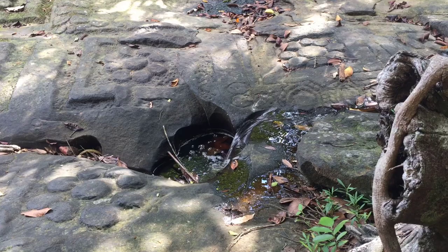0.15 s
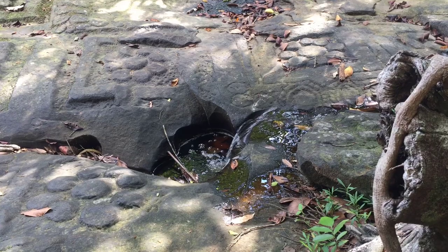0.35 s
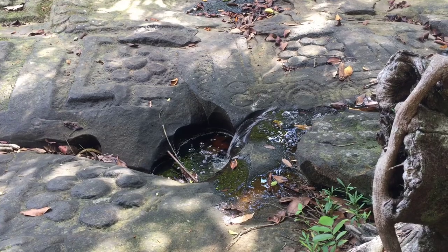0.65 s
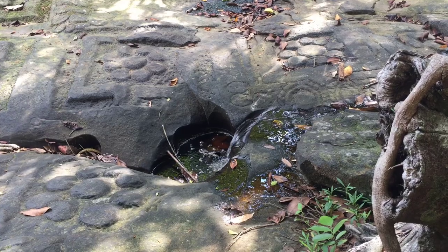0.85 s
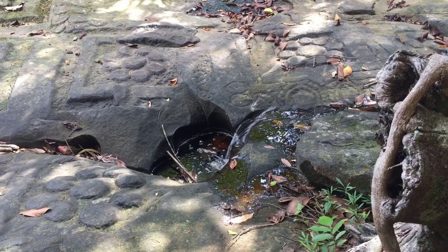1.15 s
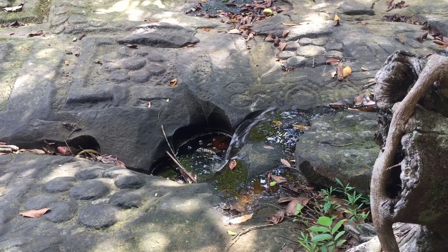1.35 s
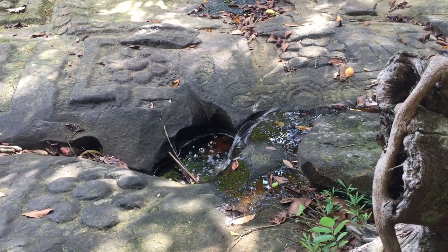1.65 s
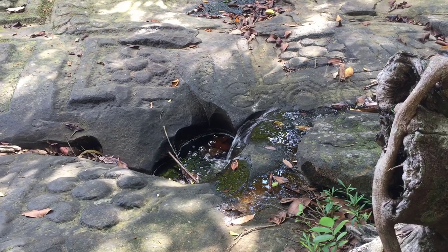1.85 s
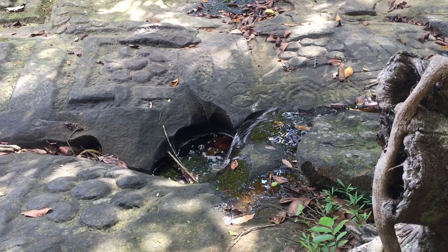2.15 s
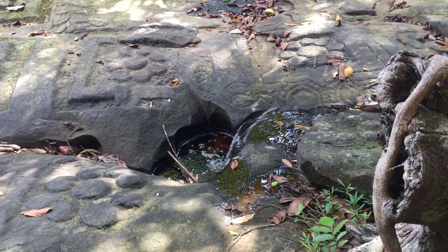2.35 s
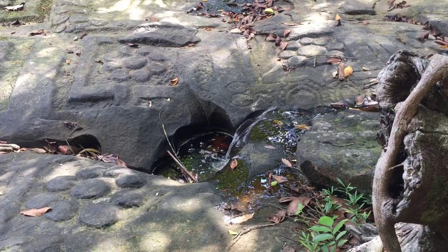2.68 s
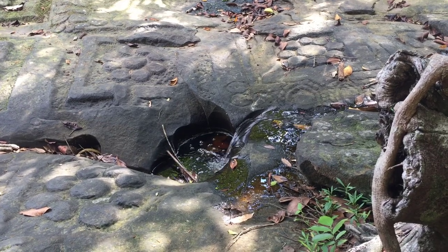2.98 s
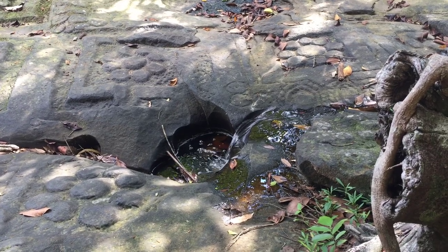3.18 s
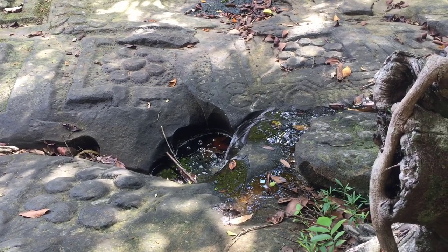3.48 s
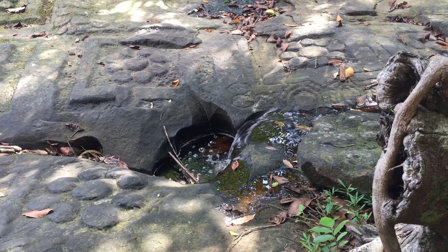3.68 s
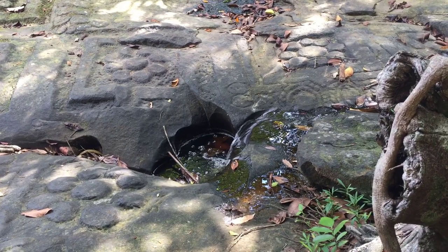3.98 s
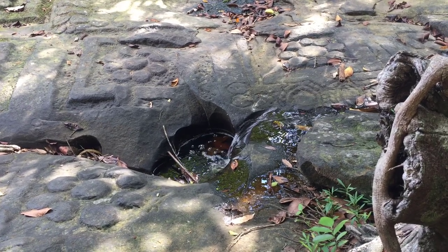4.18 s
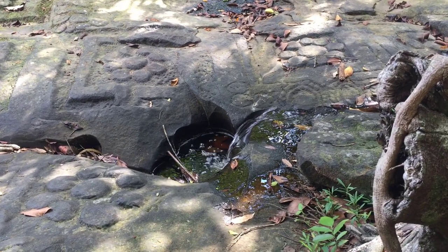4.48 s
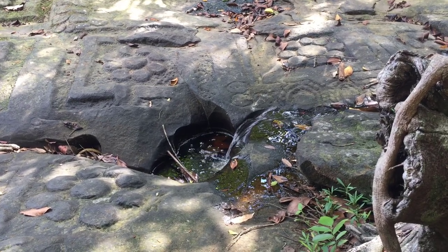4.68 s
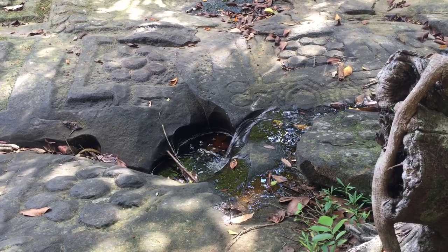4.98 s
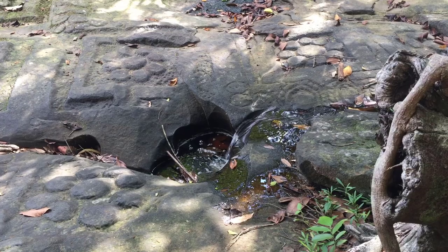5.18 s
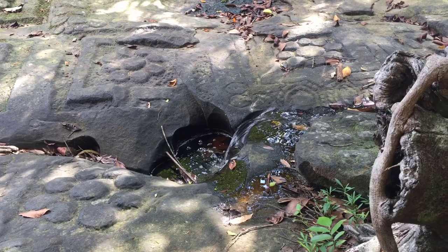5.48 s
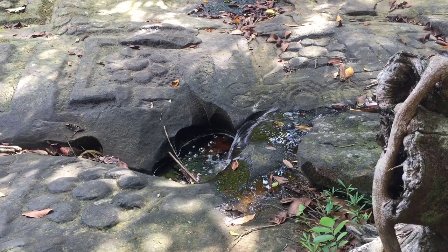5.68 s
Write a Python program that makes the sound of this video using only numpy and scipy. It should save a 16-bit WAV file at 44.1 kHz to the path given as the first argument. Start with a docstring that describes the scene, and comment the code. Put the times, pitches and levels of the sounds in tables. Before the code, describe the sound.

A thin stream of water trickles and plinks into a small rock pool, with gurgling bubbles and a faint high insect hiss behind.

```python
"""A thin stream slides over stone and falls into a small rock pool: bubbles plink as damped rising tones,
drops splash as bursts of tiny bubbles, and countless smaller ones gurgle and fizz with the flow.
Decaying low tones are soft gulps of air; resonances and a short echo are the hollow and its stone.
Behind lie a steady high hiss, likely forest insects, and a soft rumble of air, both filtered noise.
One stretch repeats; a brief silence falls near the start of each pass, the second just after a burst."""
import sys
import numpy as np
from scipy import signal
from scipy.fft import rfft, irfft
from scipy.io import wavfile
from scipy.ndimage import uniform_filter1d

SR = 44100
rng = np.random.default_rng(int(sys.argv[2]) if len(sys.argv) > 2 else 0)


def waveform_to_disk(signal):
    """Save audio, clipped to [-1, 1], as 16-bit WAV at the path in sys.argv[1]."""
    frames = np.transpose(np.atleast_2d(signal))
    scaled = np.clip(frames, -1, 1) * 32767
    samples = np.round(scaled).astype(np.int16)
    wavfile.write(sys.argv[1], SR, samples)


N = 257544
TIME = np.arange(N) / SR


def gain_of(db):
    """Level law: decibels to amplitude."""
    return 10 ** (np.asarray(db) / 20)


def evened(x):
    """Normalization of power: scales to an rms of 1."""
    return x / np.sqrt(np.mean(x ** 2) + 1e-20)


def add(mix, s, sound):
    """Superposition: adds a sound to the mix from a given time in seconds."""
    part = mix[max(round(s * SR), 0):][:len(sound)]
    part += sound[:len(part)]


def colour(x, points, size=4096):
    """Minimum-phase filtering: a causal filter of given spectrum keeps attacks sharp."""
    hz, db = np.transpose(points)
    log_f = np.log(abs(np.fft.fftfreq(size, 1 / SR)) + 1)
    # beyond the listed points the gain keeps falling
    beyond = np.maximum(np.log(hz[0]) - log_f, 0) + np.maximum(log_f - np.log(hz[-1]), 0)
    gain_db = np.interp(log_f, np.log(hz), db) - 20 * beyond
    log_gain = np.log(gain_of(gain_db))
    # the phase follows from the log gain by the Hilbert transform
    taps = np.fft.ifft(np.exp(np.conj(signal.hilbert(log_gain)))).real[:size // 2]
    return signal.fftconvolve(x, taps)[:len(x)]


def bubble(hz, swell_s, rise=0.05, roundness=2.27):
    """Bubble resonance: trapped air swells and rings down, rising in pitch as it nears the surface."""
    age = np.arange(0, 6 * max(swell_s, 10 / SR), 1 / SR) / swell_s
    # the pitch is hz at the peak (age 1) and gains the share "rise" of hz per swell time
    turns = hz * swell_s * (age + rise * (age * age / 2 - age))
    # a greater roundness ends the ring sooner
    envelope = age * np.exp((1 - age ** roundness) / roundness)
    return envelope * np.sin(2 * np.pi * turns)


def swarm(low_hz, high_hz, per_s, cycles, spread_db, glide=0.034, roundness=1.38, count=90):
    """Random superposition: small bubbles of many sizes are born by chance, a few much stronger."""
    out = np.zeros(N)
    for hz in np.geomspace(low_hz, high_hz, count):
        swell_s = cycles * rng.uniform(.4, 1.6) / hz
        shape = bubble(hz, swell_s, glide * rng.random(), roundness)
        shape *= np.sqrt(hz / np.sum(shape ** 2))  # energy in proportion to pitch
        births = rng.random((300, 2))
        times = np.cumsum(-np.log(births[:, 0])) * count / per_s
        sizes = gain_of(spread_db * np.minimum(-np.log(births[:, 1]), 3))
        for s, size in zip(times[times < N / SR], sizes):
            add(out, s, size * shape)
    return out


def foam(bubbles, spectrum, noise_share, grain_db=8.5):
    """Power mixing: bubbles share a spectrum with the unpitched patter of tiny impacts."""
    patter = evened(rng.standard_normal(N) * gain_of(grain_db * rng.standard_normal(N)))
    mixed = np.sqrt(1 - noise_share) * evened(bubbles) + np.sqrt(noise_share) * patter
    return colour(mixed, spectrum)


def sputter(x, depth_db, patch_hz, patch_s, size=256):
    """Modulation by bands: bubbles of like size come in clumps, so each band flutters on its own."""
    z = signal.stft(x, nperseg=size)[2]
    steps = np.arange(-size // 8, size // 8 + 1)
    across = np.exp(-(steps * SR / size / patch_hz) ** 2)
    along = np.exp(-(steps * size / 2 / SR / patch_s) ** 2)
    clumps = evened(signal.fftconvolve(rng.standard_normal(z.shape), np.outer(across, along), "same"))
    fluttered = z * gain_of(depth_db * 2 * np.tanh(clumps / 2))  # tanh bounds the swings
    return evened(signal.istft(fluttered, nperseg=size)[1][:N])


# strength of the jet where it enters the pool, with its short lulls: time_s [s], level_db [dB]
JET_STRENGTH = [(0.0, -38.5), (0.24, -41), (0.34, -51.5), (0.36, -41.5), (0.76, -41), (0.84, -44),
                (0.88, -39.5), (0.96, -43.5), (1.12, -41), (1.18, -46), (1.24, -39.5), (1.28, -48),
                (1.38, -38), (1.56, -42), (2.44, -41), (2.48, -48), (2.54, -38), (2.6, -45), (2.66, -42.5),
                (3.18, -41), (3.22, -44), (3.29, -41), (3.36, -42.5), (3.64, -40.5)]


def flow_db(s):
    """Linear interpolation: strength of the jet in dB at given times."""
    return np.interp(s, *np.transpose(JET_STRENGTH))


# relative spectrum of the churning water: frequency_hz [Hz], level_db [dB]
WATER_SPECTRUM = [(300, -14.5), (500, -27.5), (640, -7), (820, 1), (1060, -11.5), (1450, -0.5),
                  (1620, -6.5), (2000, -6), (2600, -1), (3000, -14.5), (3800, -17.5)]
# relative spectrum of its fine spray: frequency_hz [Hz], level_db [dB]
SPRAY_SPECTRUM = [(2300, -3), (3250, 4.5), (4200, -1.5), (4850, -7), (5700, -1.5), (7600, -5.5), (8900, 0),
                  (10300, -8), (15000, 1.5)]


def churn(gurgle_db=-9.5, fizz_db=-11.0):
    """Amplitude modulation: gurgle and fizz follow the flow and sputter as the jet breaks up."""
    low_bubbles = swarm(low_hz=698.5, high_hz=3307, per_s=900, cycles=3.23, spread_db=2.5)
    gurgle = foam(low_bubbles, WATER_SPECTRUM, noise_share=0.42)
    high_bubbles = swarm(low_hz=2886, high_hz=13550, per_s=2000, cycles=6.8, spread_db=6.5)
    fizz = foam(high_bubbles, SPRAY_SPECTRUM, noise_share=0.79)
    gurgle = gain_of(gurgle_db) * sputter(gurgle, depth_db=5.0, patch_hz=388, patch_s=0.013)
    fizz = gain_of(fizz_db) * sputter(fizz, depth_db=3.5, patch_hz=910, patch_s=0.016)
    return gain_of(flow_db(TIME)) * (gurgle + fizz)


def slosh(level_db=-78.0):
    """Low-frequency excitation: faint lapping of the pool surface keeps the hollow ringing."""
    glugs = swarm(low_hz=160.4, high_hz=544, per_s=80, cycles=0.51, spread_db=3.5)
    return gain_of(level_db) * evened(glugs * gain_of(flow_db(TIME)))


# relative spectrum of the insect hiss: frequency_hz [Hz], level_db [dB]
INSECT_SPECTRUM = [(8000, -23.5), (10400, -14.5), (11400, -3), (12300, 0.5), (13200, 1), (14200, -8.5),
                   (15600, -18)]
# relative spectrum of the low rumble of the air: frequency_hz [Hz], level_db [dB]
AIR_SPECTRUM = [(20, -28), (35, -26), (52, -6), (100, -4.5), (200, -10), (330, -9), (600, -11),
                (2000, -13.5), (8000, -42)]


def forest(insects_db=-50.5, air_db=-62.5, flutter_db=1.0, gust_db=1.4):
    """Filtered noise: a far, even insect hiss and the uneven rumble of outdoor air."""
    flutter = evened(uniform_filter1d(rng.standard_normal(N), size=300))
    gusts = evened(uniform_filter1d(rng.standard_normal(N), size=5000))
    hiss = colour(rng.standard_normal(N), INSECT_SPECTRUM) * gain_of(flutter_db * flutter)
    rumble = colour(rng.standard_normal(N) , AIR_SPECTRUM) * gain_of(gust_db * gusts)
    return gain_of(insects_db) * evened(hiss) + gain_of(air_db) * evened(rumble)


def chance_times(per_s, count=400):
    """Poisson process: random moments at which the jet sheds something."""
    times = np.cumsum(rng.exponential(1, count)) / per_s
    return times[times < N / SR]


def any_bubble(low_hz, high_hz, bigness, damping, ref_hz=1310, ref_swell_s=0.002, power=0.59):
    """Scaling law: smaller, higher bubbles swell quicker; two chances in 0-1 set pitch and swell time."""
    hz = high_hz * (low_hz / high_hz) ** bigness
    usual_s = ref_swell_s * (ref_hz / hz) ** power
    return hz, usual_s * 2 ** (1 - 2 * damping)  # chance varies it from half to double


def lesser_bubbles(per_s, low_hz, high_hz, over_flow_db, spread_db=1.5, count=400):
    """Random shedding: weaker bubbles as strong as the flow allows; rows like LOUD_BUBBLES."""
    kinds, luck = rng.random((count, 2)), rng.standard_normal(count)
    return [(s, flow_db(s) + over_flow_db + spread_db * z, *any_bubble(low_hz, high_hz, *kind))
            for s, kind, z in zip(chance_times(per_s), kinds, luck)]


def trailing_bubbles(body_over_db=-8.0, spray_over_db=-6.0, lag_s=0.02, span=1.383, count=2):
    """Air entrainment: bubbles near a loud burst's two pitches ring after it; rows like LOUD_BUBBLES."""
    rows = []
    for s, body_db, spray_db, _, body_hz, spray_hz in LOUD_BURSTS:
        for db, hz in ((body_db + body_over_db, body_hz), (spray_db + spray_over_db, spray_hz)):
            for late, *kind in rng.random((count, 3)):
                rows.append((s + lag_s * late, db, *any_bubble(hz / span, hz * span, *kind)))
    return rows


def trickle(roundness=1.48, most_rise=0.041, wall_db=-13.5, wall_s=.008, count=2):
    """Early reflection: many weaker bubbles glide up, roughened by echoes off the pool walls."""
    out = np.zeros(N)
    rows = (trailing_bubbles()
            + lesser_bubbles(per_s=70., low_hz=902, high_hz=3580, over_flow_db=-1.5)
            + lesser_bubbles(per_s=50., low_hz=3210, high_hz=7230, over_flow_db=-3.5))
    chances = rng.random((len(rows), count + 1))
    for (s, db, hz, swell_s), (climb, *distances) in zip(rows, chances):
        ring = gain_of(db) * bubble(hz, swell_s, most_rise * climb, roundness)
        add(out, s, ring)
        for distance in distances:
            add(out, s + wall_s * distance, gain_of(wall_db) * ring)
    return out


def lesser_splashes(per_s=18.0, body_db=-15.0, spray_db=-8.5, spread_db=4.5, length_s=0.0081,
                    body_hz=1700, spray_hz=5800, octaves=0.34, count=400):
    """Random impact: weaker drops, wetter or brighter, scale with the flow; rows like LOUD_BURSTS."""
    luck = rng.standard_normal((count, 3))
    return [(s, flow_db(s) + body_db + spread_db * wet, flow_db(s) + spray_db - spread_db * wet, length_s,
             body_hz * 2 ** (octaves * low), spray_hz * 2 ** (octaves * high))
            for s, (wet, low, high) in zip(chance_times(per_s), luck)]


def focused(x, hz, db_per_octave):
    """Spectral weighting: keeps mostly the bubbles near one size."""
    octaves = abs(np.log2((np.fft.rfftfreq(len(x), 1 / SR) + 1) / hz))
    return irfft(rfft(x) * gain_of(-db_per_octave * octaves), len(x))


# the loudest bursts: drops on the pool, and last a burst just before the sound cuts out; levels
# before each layer's trim: start_s [s], body_level_db [dB], spray_level_db [dB], length_s [s],
# body_pitch_hz [Hz], spray_pitch_hz [Hz]
LOUD_BURSTS = [(0.012, -38, -49, 0.0055, 1280, 3920), (0.1, -37.5, -47, 0.0045, 1270, 3970),
               (0.209, -36, -41.5, 0.0042, 1140, 5660), (0.363, -52, -48, 0.0035, 895, 3980),
               (0.365, -65, -40.5, 0.0082, 2090, 4730), (0.45, -44, -41.0, 0.0039, 1470, 6660),
               (0.5063, -42.5, -38, 0.0035, 1060, 7400), (0.514, -48, -38, 0.0035, 816, 6200),
               (0.617, -38.0, -43, 0.0036, 955, 4420), (0.6242, -46.0, -32.5, 0.0035, 2170, 9100),
               (0.653, -50, -39, 0.0066, 2240, 5600), (0.675, -41, -46, 0.0056, 1840, 3880),
               (0.6882, -39, -43, 0.003, 1760, 5100), (0.758, -53, -39.5, 0.0096, 1740, 3750),
               (0.9226, -38, -44, 0.0043, 1730, 5490), (1.0178, -42, -40, 0.0036, 1010, 6400),
               (1.1245, -45.5, -39.5, 0.0085, 2310, 4170), (1.2045, -41.0, -41, 0.01, 1440, 3530),
               (1.2515, -35.5, -40, 0.0023, 1750, 8000), (1.319, -36.5, -41.5, 0.0024, 1920, 3730),
               (1.355, -42, -52, 0.0085, 1770, 3230), (1.3754, -38.0, -42.0, 0.0051, 1850, 3880),
               (1.387, -42, -35, 0.0018, 1920, 3540), (1.4661, -37, -38, 0.0068, 1540, 3620),
               (1.62, -38, -39.5, 0.007, 2330, 4320), (1.662, -46, -39, 0.0023, 960, 7840),
               (1.693, -42, -35, 0.0026, 1870, 8230), (1.697, -34.5, -46, 0.0036, 2300, 5250),
               (1.7945, -36.5, -39, 0.0038, 1760, 4200), (1.811, -40.0, -42, 0.004, 1260, 5000),
               (1.881, -46, -38.5, 0.0048, 2200, 3620), (1.981, -41.5, -45, 0.01, 1150, 3430),
               (2.0929, -46, -42.5, 0.01, 1640, 4660), (2.208, -50, -37.5, 0.0045, 1380, 6800),
               (2.334, -45, -40.5, 0.0055, 930, 4000), (2.622, -46, -44, 0.011, 1680, 4540),
               (2.662, -39, -40, 0.0055, 1860, 3960), (2.6743, -37, -40.0, 0.0026, 1810, 5700),
               (2.742, -41.5, -37.5, 0.003, 2420, 3880), (2.7486, -44.5, -38, 0.0093, 1910, 4430),
               (2.8185, -55, -41, 0.0035, 2920, 4240), (2.8594, -39.5, -39, 0.0053, 1480, 4900),
               (2.9305, -36, -51, 0.0026, 1220, 5540), (2.9888, -44.5, -40, 0.003, 1820, 4970),
               (3.1996, -32.5, -42, 0.0017, 1850, 3950), (3.211, -48, -40, 0.0035, 1670, 4940),
               (3.2515, -35.5, -41, 0.004, 2100, 4100), (3.2625, -49, -38, 0.0038, 1050, 6500),
               (3.3336, -44.5, -42.5, 0.0087, 2170, 5600), (3.389, -39, -39, 0.0047, 1200, 6700),
               (3.453, -41, -38, 0.01, 2450, 4030), (3.5491, -49, -39.5, 0.0036, 1990, 7010),
               (3.56, -37, -39, 0.0052, 1770, 4750), (3.639, -33.5, -31.5, 0.0037, 2740, 3740)]


def splashes(body_db=-1.0, spray_db=-3.0, body_focus_db=4.5, spray_focus_db=9.5, size=3000):
    """Granular burst: tiny bubbles, swelling and fading, form a wet body and a bright spray, each pitched."""
    out, t = np.zeros(N), np.arange(size) / SR
    low_bubbles = swarm(low_hz=643.0, high_hz=3660, per_s=900, cycles=2.6, spread_db=0.5)
    body = foam(low_bubbles, WATER_SPECTRUM, noise_share=0.16)
    high_bubbles = swarm(low_hz=2784, high_hz=13530, per_s=2600, cycles=3.54, spread_db=3.0)
    spray = foam(high_bubbles, SPRAY_SPECTRUM, noise_share=0.059)
    for s, low_db, high_db, length, low_hz, high_hz in LOUD_BURSTS + lesser_splashes():
        age = 2 * t / length  # the envelope peaks at half the length
        at = min(round(s * SR), N - size)
        for layer, db, hz, focus_db in ((body, low_db + body_db, low_hz, body_focus_db),
                                        (spray, high_db + spray_db, high_hz, spray_focus_db)):
            burst = focused(layer[at:at + size], hz, focus_db) * age * np.exp(-age)
            # the level is the rms the burst's energy would have if spread over its length
            add(out, s, gain_of(db) * evened(burst) * np.sqrt(length * SR / size))
    return out


# soft, deep gulps of air under the rock lip: start_s [s], level_db [dB], pitch_hz [Hz],
# length_s [s, time to the peak]
AIR_GULPS = [(0.025, -46, 91.5, 0.0038), (0.019, -42.5, 496, 0.0044), (0.104, -46.5, 385, 0.0071),
             (0.158, -53, 261, 0.013), (0.554, -51, 254, 0.0076), (1.312, -51, 230, .008),
             (1.382, -49, 379, .014), (1.666, -50, 282, 0.0048), (2.098, -48, 397, 0.0094),
             (2.236, -50, 415, 0.0066), (2.232, -55, 102, 0.006), (2.316, -52, 263, 0.013),
             (2.332, -42, 415, 0.0067), (2.394, -49, 255, 0.0052), (2.671, -53, 253, 0.0089),
             (3.036, -53.5, 257, .009), (3.143, -48.5, 179, 0.0054), (3.144, -43, 255, 0.0052),
             (3.148, -47, 411, 0.011), (3.578, -50, 264, 0.0058)]


def gulps(size=5000):
    """Damped oscillation: big pockets of air swell softly and die away."""
    out, t = np.zeros(N), np.arange(size) / SR
    for s, db, hz, length in AIR_GULPS:
        envelope = t / length * np.exp(1 - t / length)
        add(out, s, gain_of(db) * envelope * np.sin(2 * np.pi * hz * t))
    return out


# the loudest bubbles, levels before the trims: start_s [s], level_db [dB], pitch_hz [Hz, at the
# envelope's peak], swell_s [s]
LOUD_BUBBLES = [(0.032, -32, 1940, 0.0019), (0.0318, -33, 680, 0.0043), (0.1096, -38, 1360, 0.0039),
                (0.1777, -27.5, 1440, 0.0014), (0.208, -32, 1974, 0.0055), (0.21, -30.5, 1460, 0.0009),
                (0.2103, -30.5, 6330, 0.0013), (0.2282, -29, 815, 0.0023), (0.2313, -29.5, 1220, 0.0011),
                (0.37, -33, 3900, 0.0016), (0.3759, -37, 3160, 0.0033), (0.406, -37.5, 1010, 0.003),
                (0.4514, -32.5, 6500, 0.001), (0.534, -36, 2040, 0.0033), (0.5532, -35, 824, 0.0039),
                (0.567, -30, 1720, 0.0018), (0.586, -37, 960, 0.0023), (0.595, -43.5, 5170, 0.0029),
                (0.625, -33, 1770, 0.0036), (0.6574, -31, 2080, 0.0022), (0.671, -32.5, 5840, 0.0012),
                (0.6769, -31, 1910, 0.002), (0.6763, -30, 2640, 0.0014), (0.6862, -30, 1510, 0.0048),
                (0.732, -35, 1440, 0.0043), (0.7695, -38, 2860, 0.0011), (0.8811, -36.5, 700, 0.0064),
                (0.928, -38.5, 1050, 0.0032), (1.019, -35, 5940, 0.0022), (1.0614, -39, 890, 0.0037),
                (1.1079, -34.5, 2480, 0.0026), (1.122, -39, 894, 0.003), (1.1285, -23, 4220, 0.0009),
                (1.1292, -34, 6060, 0.0013), (1.2125, -34.5, 3276, 0.0023), (1.2466, -29, 2120, 0.0031),
                (1.249, -34, 7820, 0.0014), (1.298, -37.5, 760, 0.0033), (1.3176, -39.0, 1250, 0.008),
                (1.3559, -34, 1590, 0.0033), (1.3582, -32, 930, 0.002), (1.3587, -30, 2390, 0.0011),
                (1.3769, -24.5, 2170, 0.00087), (1.3923, -29, 2760, 0.0021), (1.455, -37, 1263, 0.0064),
                (1.4656, -37.5, 2330, 0.0033), (1.468, -27, 910, 0.0018), (1.487, -32, 2570, 0.0024),
                (1.523, -35.5, 1530, 0.0038), (1.524, -33.5, 2340, 0.0033), (1.5967, -29, 2750, 0.0012),
                (1.6221, -38, 900, 0.0064), (1.6235, -31, 2440, 0.0024), (1.6256, -35, 3230, 0.0011),
                (1.6267, -34, 1280, 0.0027), (1.645, -38, 780, 0.0038), (1.6593, -30, 7400, 0.0012),
                (1.685, -36, 1010, 0.003), (1.6934, -29, 7550, 0.0013), (1.8059, -35, 832, 0.0067),
                (1.844, -37.5, 1250, 0.004), (1.855, -28, 1690, 0.0017), (1.8887, -31.5, 1390, 0.0022),
                (1.947, -26, 2730, 0.00061), (1.9867, -36, 1460, 0.007), (2.013, -35.5, 800, 0.0033),
                (2.0182, -30, 4130, 0.0015), (2.0939, -26.5, 1380, 0.0034), (2.0948, -22.5, 1930, 0.0018),
                (2.14, -36, 2630, 0.0042), (2.2271, -35.5, 3350, 0.0023), (2.279, -40, 2060, 0.0034),
                (2.302, -33, 2570, 0.0015), (2.3025, -30.5, 714, 0.0035), (2.3344, -31.5, 6050, 0.0011),
                (2.335, -32.0, 2620, 0.0018), (2.3444, -33.5, 817, 0.0029), (2.506, -31, 788, 0.004),
                (2.5353, -30, 1120, 0.0023), (2.624, -26.5, 1800, 0.0022), (2.6496, -34, 1980, 0.0024),
                (2.652, -27.5, 1520, 0.0022), (2.6645, -37, 2540, 0.0033), (2.7078, -34.5, 983, 0.0039),
                (2.7255, -36.5, 3280, 0.0033), (2.7426, -38, 1480, 0.0063), (2.8572, -43, 2480, 0.0063),
                (2.858, -32.0, 1380, 0.0026), (2.895, -32.5, 5470, 0.0012), (2.9321, -29.0, 2000, 0.0024),
                (2.9875, -38.5, 2710, 0.0045), (2.9912, -27.5, 5930, 0.0011), (3.057, -40, 3140, 0.0028),
                (3.138, -34.5, 810, 0.002), (3.146, -32, 1854, 0.0044), (3.201, -33, 2800, 0.0014),
                (3.2003, -50, 1270, 0.001), (3.2005, -26, 2050, 0.0011), (3.2001, -24, 1720, 0.0052),
                (3.2238, -33, 1970, 0.0027), (3.2316, -35, 2390, 0.0016), (3.3031, -33, 2860, 0.0011),
                (3.3372, -35, 2140, 0.003), (3.378, -34.5, 1450, 0.0033), (3.378, -35, 3020, 0.0024),
                (3.414, -39.5, 840, 0.0066), (3.4508, -38.5, 2090, 0.004), (3.533, -32.5, 750, 0.0037),
                (3.5484, -37, 2240, 0.0033), (3.591, -30.5, 2260, 0.0021), (3.634, -29, 820, 0.0019)]


def plinks(level_db=-0.4, slap_db=-21.5, slap_s=0.0016, size=1000):
    """Bubble resonance: each larger bubble is born with a small slap of the water that traps it."""
    out, t = np.zeros(N), np.arange(size) / SR
    slaps = evened(colour(rng.standard_normal(N), WATER_SPECTRUM))
    for s, db, hz, swell_s in LOUD_BUBBLES:
        add(out, s, gain_of(db + level_db) * bubble(hz, swell_s))
        add(out, s, gain_of(db + slap_db) * slaps[round(s * SR):][:size] * np.exp(-t / slap_s))
    return out


# sharp ticks of drops on bare stone: start_s [s], level_db [dB], pitch_hz [Hz]
STONE_TICKS = [(.5099, -28, 11000), (1.6606, -17.5, 8700), (1.6942, -29, 8000), (2.6753, -26, 12400),
               (2.8213, -32, 11800), (3.267, -16.5, 11800)]


def ticks(swell_s=0.00013, crack_db=-20.0, crack_s=0.00012, tail_db=-8.5, tail_s=0.0015, size=500):
    """Hard impact: a drop on stone gives a brief ping, a wide crack and a short scatter of spray."""
    out, t = np.zeros(N), np.arange(size) / SR
    ping = (t / (2 * swell_s)) ** 2 * np.exp(2 - t / swell_s)
    crack = gain_of(crack_db) * np.exp(-abs(t - 2 * swell_s) / crack_s)  # centred on the ping's peak
    scatter = gain_of(tail_db) * np.exp(-t / tail_s)
    for s, db, hz in STONE_TICKS:
        bright = evened(np.diff(rng.choice([-1., 1.], size + 1)))
        add(out, s, gain_of(db) * (ping * np.sin(2 * np.pi * hz * t) + (crack + scatter) * bright))
    return out


# quick chains of bubbles whose pitch climbs: start_s [s], length_s [s], level_db [dB],
# first_pitch_hz [Hz], last_pitch_hz [Hz]
BUBBLE_CHAINS = [(0.976, 0.071, -45, 880, 970), (1.813, 0.032, -44, 845, 1350),
                 (3.217, 0.033, -34, 1640, 2650), (3.287, 0.039, -45, 910, 950)]


def gurgles(step_s=.007, ring_cycles=2.25, spread_db=-0.5, count=16):
    """Serial resonance: a fold in the jet sheds bubbles at uneven steps, each smaller than the last."""
    out = np.zeros(N)
    for s, length, db, first_hz, last_hz in BUBBLE_CHAINS:
        for k, (late, strength) in enumerate(rng.uniform(-1.03, 1, (count, 2))):
            age = step_s * (k + late / 3)
            if age < length:
                hz = first_hz * (last_hz / first_hz) ** (age / length)
                add(out, s + age, gain_of(db + spread_db * strength) * bubble(hz, ring_cycles / hz))
    return out


# air modes of the hollow above the pool: frequency_hz [Hz], width_hz [Hz], gain_db [dB at resonance]
AIR_MODES = [(269, 33.4, 17), (414.5, 55, 14), (840, 360, -6.5), (1526, 70, -3)]


def hollow(x):
    """Cavity resonance: the air in the rock hollow rings along with the water."""
    t = np.arange(SR // 10) / SR
    ring = np.zeros(len(t))
    for hz, width, db in AIR_MODES:
        decay = np.exp(-np.pi * width * t)
        ring += gain_of(db) * 2 * np.pi * width / SR * decay * np.sin(2 * np.pi * hz * t)
    return signal.fftconvolve(x, ring)[:N]


def rock_echo(x, t60=0.046, first_s=.002, echo_db=-6.5, dull_hz=5370.0):
    """Diffuse reflection: close mossy stone scatters the sound into a very short, dull tail."""
    t = np.arange(SR // 4) / SR
    sparse = rng.standard_normal(len(t)) * (rng.random(len(t)) < .1)
    taps = sparse * (t > first_s) * gain_of(-60 * t / t60)
    taps = signal.lfilter(*signal.butter(1, dull_hz, fs=SR), taps / np.linalg.norm(taps))
    return gain_of(echo_db) * signal.fftconvolve(x, taps)[:N]


def scene():
    """Superposition: water in its hollow, with the forest behind."""
    water = plinks() + trickle() + gurgles() + ticks() + splashes() + churn() + slosh()
    return (water + hollow(water) + rock_echo(water) + gulps() + forest())[None]


def record(dry, loop_s=3.6, silent_from_s=.044, silent_to_s=.0905, fade_s=0.003, edge_hz=15750):
    """Repetition and band limit: one stretch plays again, dying into a short silence in each pass."""
    in_pass = TIME % loop_s
    since_cut = np.maximum(in_pass - silent_from_s, 0) * (in_pass < silent_to_s)
    # the jump back to the earlier sound lies midway in the second silence
    repeating = TIME > loop_s + (silent_from_s + silent_to_s) / 2
    at = np.arange(N) - round(loop_s * SR) * repeating
    looped = dry[:, at] * np.exp(-since_cut / fade_s)
    low_pass = signal.firwin(511, edge_hz, window=("kaiser", 9), fs=SR)
    return signal.oaconvolve(looped, low_pass[None], "same")


dry = scene()
out = record(dry)
waveform_to_disk(out)
```